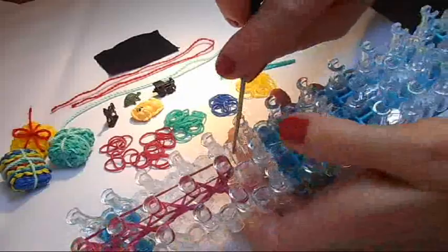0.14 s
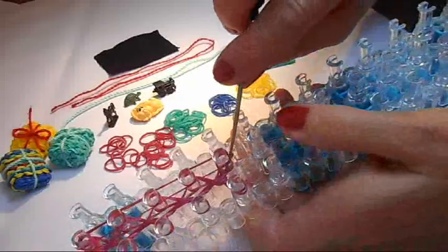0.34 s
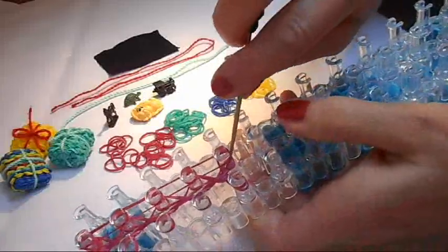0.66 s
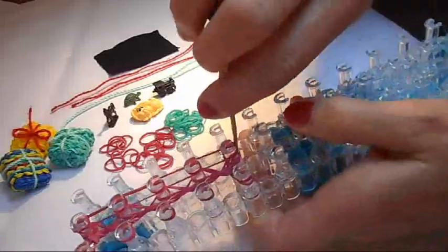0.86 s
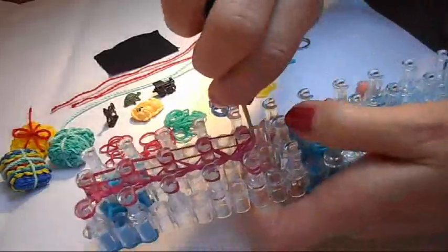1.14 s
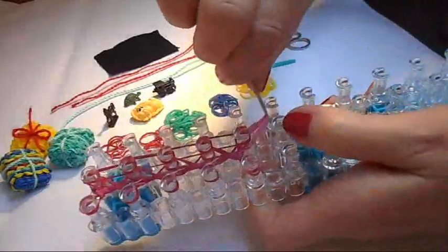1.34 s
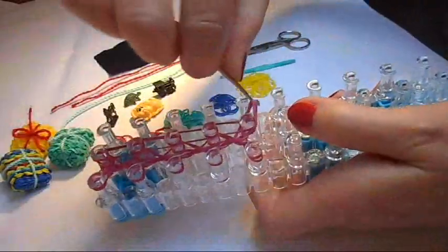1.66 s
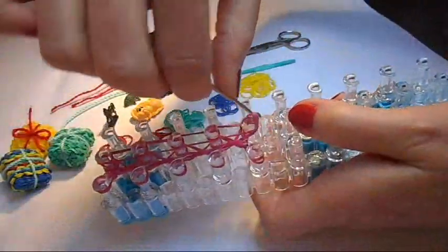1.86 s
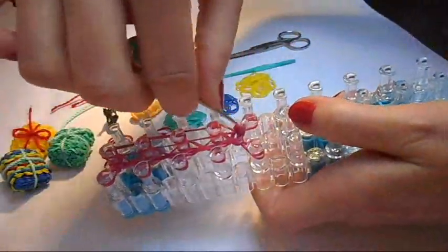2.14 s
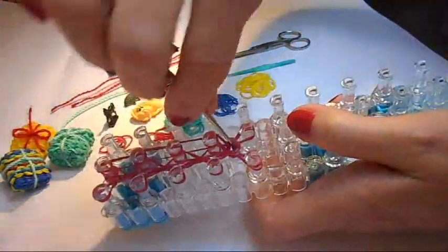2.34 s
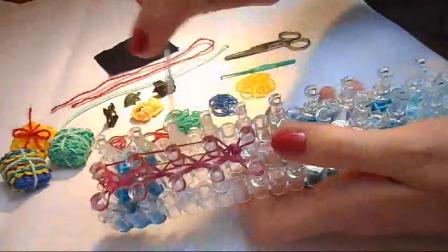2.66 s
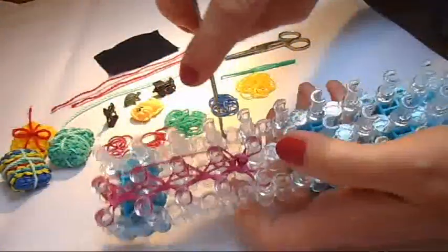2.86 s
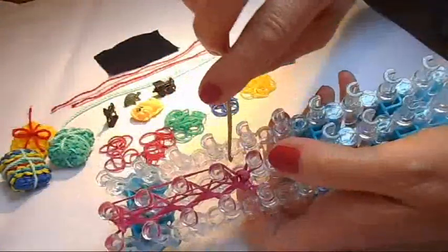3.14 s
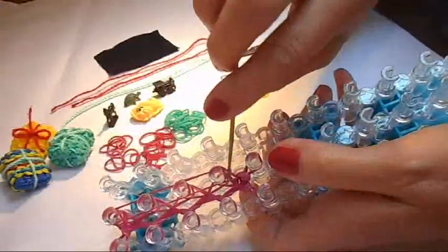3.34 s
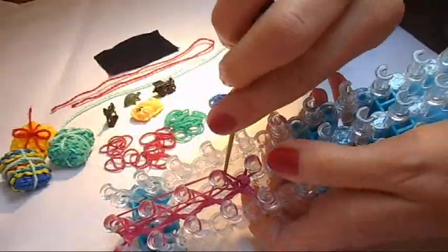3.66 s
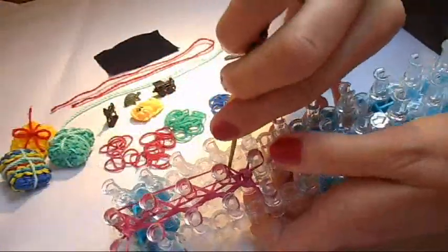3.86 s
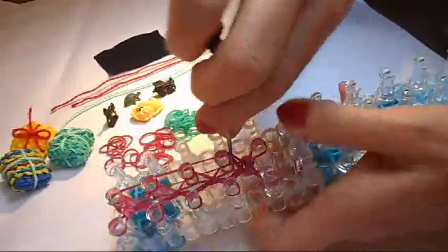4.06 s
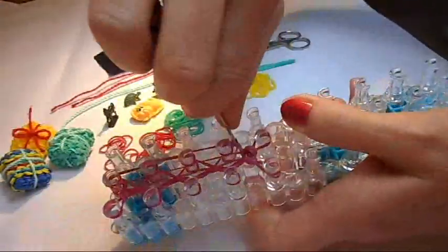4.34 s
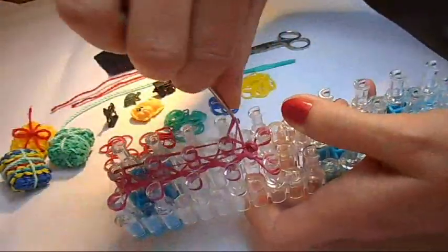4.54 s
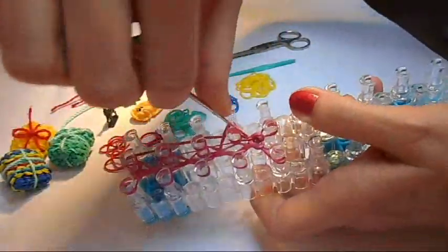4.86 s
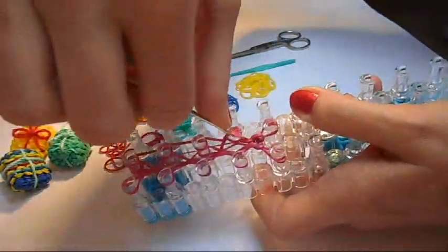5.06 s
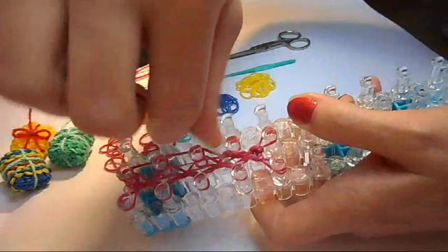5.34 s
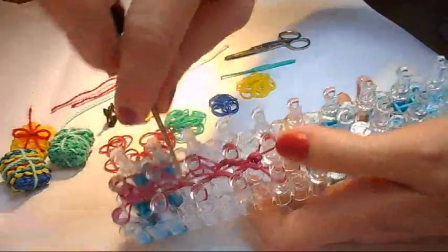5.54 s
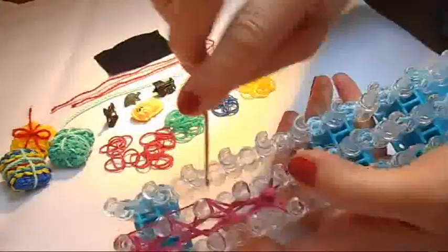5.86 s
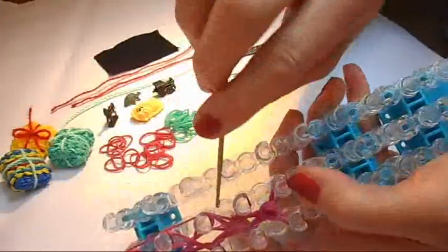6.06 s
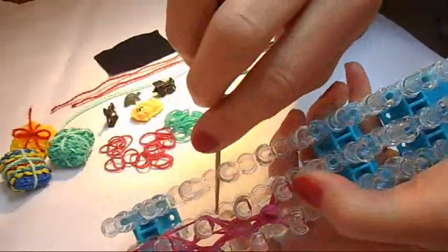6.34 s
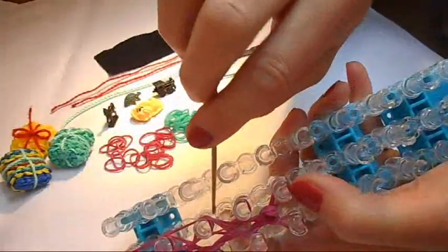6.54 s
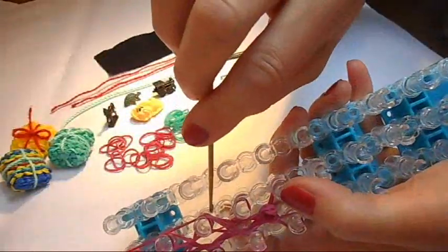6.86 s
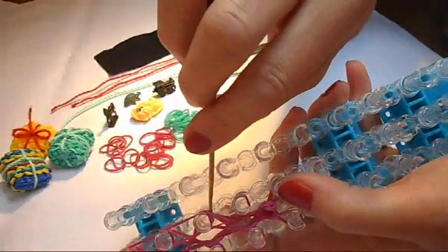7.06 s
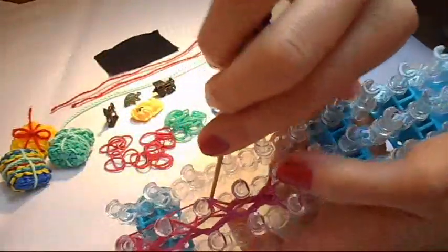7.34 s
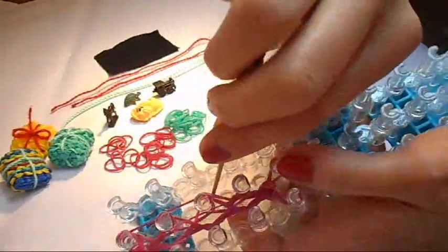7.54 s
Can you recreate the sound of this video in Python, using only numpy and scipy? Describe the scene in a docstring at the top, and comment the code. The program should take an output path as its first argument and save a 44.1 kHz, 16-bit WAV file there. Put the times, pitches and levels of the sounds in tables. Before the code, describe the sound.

Indoors, over the steady hiss of a fan, a metal hook taps and scratches at plastic loom pegs close to the microphone. The small, chattering clicks come unevenly, some sharp and some faint, as rubber bands are lifted over. Two busy runs each end with a soft scrape of the loom on the table. Then the loom is held off the table and the taps turn thinner, ending with a few quiet ticks.

```python
"""Indoors, a small camera's microphone close to a hand-held plastic loom; a fan hisses in the room throughout.
From 0.3 s a metal hook works rubber bands over the hollow pegs: each tap chatters and rings the loom.
Near 3 s the loom slides on the table between rows; the taps pick up at 4 s, and it slides again at 5.8 s.
Held off the table, it gives thinner taps from 6.2 s, and a few faint ones close the scene after 7.2 s.
All along the camera samples at half rate and repeats each sample, which mirrors the treble upwards."""
import sys
import numpy as np
from scipy import signal
from scipy.fft import rfft, irfft, next_fast_len
from scipy.io import wavfile

SR = 44100
rng = np.random.default_rng(int(sys.argv[2]) if len(sys.argv) > 2 else 0)


def wav_record(signal):
    """Record a signal, one row per channel, as 16-bit PCM in the file named by sys.argv[1]."""
    frames = np.transpose(np.atleast_2d(signal))
    bounded = np.clip(frames, -1, 1)
    # unit amplitude maps onto the largest positive 16-bit level
    quanta = np.round(bounded * 32767).astype(np.int16)
    wavfile.write(sys.argv[1], SR, quanta)


N = 339129

# hook on pegs: start_s, level_db (first 10 ms), hardness_db_per_octave, base_over_bar_db, favoured_hz,
# rise_ms, fade_ms (both before each part's contact share)
TAPS = [(0.2894, -34.5, -1.5, -5, 3500, 0.75, 2.3), (0.5636, -47, -5.2, -1, 3400, 0.67, 4.7),
        (0.761, -51, 1, -7, 3610, 1.18, 4.5), (0.766, -40.5, -6, -16, 1720, 1.28, 6.1),
        (0.9654, -28.5, -2.5, -15, 2540, 0.61, 5.9), (1.1079, -32, -5.5, -6, 1950, 1.18, 4.6),
        (1.1804, -33, 3.0, -13, 3080, 1.6, 4.0), (1.262, -44, -5, -5, 2580, 0.85, 3.8),
        (1.281, -40.5, -1.0, -5, 3300, 0.91, 2.9), (1.3096, -49.5, -2, -16, 2000, 1.2, 3.1),
        (1.325, -58, 0.7, -2, 2810, 0.25, 2.2), (1.3829, -41.0, -0.5, -7, 2440, 0.98, 3.5),
        (1.4066, -51, -7.3, -7, 2070, 1.05, 4.5), (1.4151, -47.5, -4.3, -10, 1830, 0.84, 3.6),
        (1.4256, -46, -8.3, -9, 1800, 0.33, 1.6), (1.4413, -33, 2, -4.5, 1290, 1, 2.6),
        (1.459, -34, 1, -18, 3080, 0.67, 2.9), (1.4803, -37.0, 2, -10, 3420, 1.17, 3.5),
        (1.5047, -33, 5, -13, 2070, 0.88, 2.7), (1.533, -38.5, 1, 1, 2650, 1.33, 3),
        (1.5456, -38, 3, -21, 2290, 1.48, 2.5), (1.556, -31, 3, -6, 2710, 1.44, 3.1),
        (1.5626, -29, 8.5, -10, 6550, 0.41, 3.2), (1.605, -34.5, 0.8, -3, 2780, 1.37, 2.8),
        (1.622, -45, 0, -9, 2060, 0.33, 4.2), (1.645, -33, -6.5, -6, 2770, 1.3, 3.7),
        (1.6588, -23.5, 0.3, -6.5, 2700, 0.28, 2.8), (1.7105, -54, -2, -13, 1580, 0.25, 2.3),
        (1.7551, -26.5, 4.5, -10.5, 4540, 2, 2.1), (1.9, -31.5, 4, -11, 3050, 0.42, 3.7),
        (2.028, -57, 9, -2, 3400, 0.25, 3), (2.0457, -33.5, 2.5, -5.5, 1570, 0.84, 4),
        (2.0929, -18, 1.6, -17, 1900, 0.5, 3.6), (2.2, -36, -1, -12, 3400, 1.22, 3.1),
        (2.2163, -30, -0.2, -16, 2780, 1.4, 2.9), (2.3397, -35.5, -1.5, -10.5, 1980, 1.3, 4.2),
        (2.544, -40, -3.5, -9, 1950, 1.2, 11), (2.5646, -28, 0.2, -6, 3100, 1, 6.7),
        (2.675, -45.5, -5, -16, 1720, 0.87, 4.5), (2.685, -39.0, 0, -2, 2720, 0.76, 2.6),
        (2.7977, -38.5, -0.3, -14, 1870, 1.5, 3.3), (3.3528, -39, 0.8, -9, 1910, 0.7, 2.5),
        (3.592, -51.0, -1.7, -1, 1360, 0.25, 1.8), (3.6081, -43.0, 1.5, -9, 3400, 0.3, 2.6),
        (3.7241, -42.5, -2.3, -2.5, 1760, 1.2, 2.5), (4.071, -29, -5, -14, 1980, 1.6, 2),
        (4.119, -46, 0.5, -8, 1930, 0.78, 11), (4.1496, -32, 2.3, -13, 3140, 1.1, 2.5),
        (4.203, -41.5, -3.5, -11, 2020, 1, 3.6), (4.2488, -36.5, -2.5, -4, 2080, 0.84, 2.3),
        (4.2678, -20.5, 3.5, -1.5, 3200, 1.16, 2.9), (4.3521, -24.5, -0.0, -6.5, 4240, 1.37, 3.3),
        (4.3884, -34.0, -5, -14, 3420, 1.23, 2.7), (4.48, -23, 2.7, -5.5, 2070, 1.45, 3.7),
        (4.615, -44.0, 0.5, -9, 3070, 0.72, 4.1), (4.7183, -21, 1, -11, 2660, 0.76, 3.9),
        (4.9554, -32.5, -0.9, -21, 1950, 1.6, 3), (5.111, -39.5, -3, -6, 4620, 1.8, 6.2),
        (5.114, -23.5, 4.1, -29, 4700, 1.3, 2.7), (5.208, -34.5, -0.4, -6.5, 4190, 0.78, 3),
        (5.371, -43.5, -0.5, -10, 2000, 1.55, 3), (5.4, -48, -7.6, -13, 1960, 1.13, 2.6),
        (5.4143, -26, 1.1, -12, 2100, 0.82, 2.6), (5.433, -46, 7, -2, 2770, 1.38, 2.9),
        (5.4743, -40, 0.8, -19, 3190, 0.76, 3.5), (5.484, -28.5, -2, -11.5, 1920, 0.89, 3.7),
        (5.513, -46, -8, -12, 2000, 1.18, 5.1), (5.5185, -35.5, -6.5, -1, 2100, 1.7, 6.5),
        (5.5702, -22.5, 5.0, -3.5, 5500, 0.68, 4.4), (5.6815, -46, 2, -17, 3450, 0.59, 2.2),
        (5.696, -55.0, 2, -7, 2100, 0.6, 2), (5.7524, -45, 2.3, -6, 3100, 0.53, 9.4),
        (5.7776, -47.5, 3, 0, 1860, 0.8, 8.4), (5.796, -47, -3.2, -14, 1900, 0.68, 1.9),
        (6.2064, -26, -5.5, -17, 1880, 0.8, 5), (6.2575, -39.5, -5.5, -16, 1900, 0.86, 3.6),
        (6.395, -31.5, 3, -2, 1310, 1.5, 3.1), (6.4296, -49, -0.2, 4, 1300, 0.54, 3.3),
        (6.484, -31, 2.5, -6.5, 4010, 1.8, 3.9), (6.5352, -42.0, 2.5, -4, 2780, 0.74, 2.8),
        (6.602, -28.5, -0.5, -3.5, 1840, 1.4, 2.8), (7.291, -48, 2, -2, 1820, 0.96, 2.7),
        (7.424, -46.5, 1.1, -10, 1880, 0.83, 3), (7.4375, -52, -3, -6, 1900, 0.6, 2),
        (7.4477, -53, -3, 3, 3100, 0.6, 1.8), (7.511, -56, -8, -8, 1900, 0.5, 1.4)]
# modes, one list each for bar, table, base, pegs, peg lips, hook tip: pitch_hz, level_db, t60_s
PART_MODES = [
    [(1520, -10, 0.02), (1696, -3.5, 0.023), (1873, 1.5, 0.023), (2093, 2, 0.017), (2348, -4, 0.017)],
    [(483, 3, 0.022), (654, -1, 0.044)],
    [(900, -17, .035), (1080, -11, .022), (1310, 0, .032)],
    [(2553, -7, 0.018), (2787, 1, 0.0072), (2956, -3.5, 0.018), (3053, -1.5, 0.01), (3412, -1.5, 0.014),
     (3865, 0.5, 0.0075), (4240, -4, 0.014)],
    [(4570, -2, 0.0078), (5160, -1.5, 0.0095), (5780, 0, 0.011), (6110, 0.5, 0.0059), (6370, -0.5, 0.01),
     (6680, 0.5, 0.0062), (7180, -3.5, 0.006)],
    [(7760, 0, 0.008), (8170, -3, 0.009), (8700, -4.5, 0.005), (9800, -8, 0.0084), (10230, -10.5, 0.0033)],
]
# contact length for the same six parts: share of the tap's rise and fade
CONTACT_SHARE = [0.68, 0.8, 0.71, 0.89, 1.19, 1.04]
# bar, pegs, peg lips, hook tip in a tap of hardness 0: level_db
TAP_PART_DB = [-4.5, -4, -7, -16]
# pitch of those four parts, counted from about the pegs: height_octaves
TAP_PART_OCTAVES = [-0.61, -0.044, 0.82, 1.54]
# low end of a tap, lifted as the loom rests on the table, thinned when held off: time_s, gain_db
RESTING = [(0, 1), (2, 3), (4, 4.5), (4.8, 4), (5.1, 10), (5.7, 10), (6.1, -16), (6.7, -12), (7.2, -3)]
# strokes of loom on table, hook and bands on pegs:
# start_s, swell_s, hold_s, die_s, pegs_db, frame_db, whistle_hz, whistle_db
RUBS = [(0.096, 0.013, .055, .02, -50.5, -62, 3410, -57), (1.108, .004, .012, 0.06, -50, -58, 3600, -53),
        (1.185, .004, .012, 0.14, -53.5, -57, 3420, -61), (1.508, .04, 0.016, .005, -47, -47.5, 5200, -61),
        (2.112, .004, 0.062, .02, -54, -59, 4270, -68), (2.234, .004, .03, .04, -61, -67, 3800, -71),
        (2.714, 0.052, 0.032, .005, -53.5, -54, 5150, -64),
        (2.804, .004, 0.025, .05, -51.5, -57, 4240, -55),
        (2.877, 0.038, .02, 0.037, -55.5, -60.5, 4170, -54.5),
        (2.986, 0.039, 0.017, .045, -50.5, -52.5, 3100, -59),
        (4.141, .004, 0.061, 0.012, -51.5, -60, 3740, -54), (4.41, 0.06, .02, .005, -58, -55, 3400, -56),
        (5.125, .003, .01, 0.067, -63, -65, 3850, -66), (5.794, .004, .015, 0.043, -54.5, -56, 4140, -59),
        (5.827, 0.074, .045, .07, -54, -64, 4220, -53.5), (7.425, .004, 0.012, 0.039, -57, -60, 3700, -65)]
# rubbing balance within the frame (first three parts) and within pegs and tip (last three): level_db
RUB_PART_DB = [-9.5, -28, -17.5, 1, 0.5, -11]
# loom landing on the table top: start_s, level_db, favoured_hz
KNOCKS = [(2.5659, -49.5, 480), (5.5185, -54.5, 660), (2.0933, -62, 480), (4.7189, -66, 640),
          (6.5, -60, 480)]
# low bumps as the loom is shifted on the table: peak_s, level_db
BUMPS = [(2.822, -75), (5.605, -79), (5.788, -73)]
# the room's echo by band: band_hz, t60_s, level_db
ROOM_BANDS = [(497, 0.91, -23), (1990, 0.12, -14), (5140, 0.16, -13), (10000, 0.27, -21.5)]
# spectrum of the room and microphone hiss: frequency_hz, relative_db
HISS_SPECTRUM = [(15, -57), (25, -24.5), (103, -21.5), (140, -21), (199, -18.5), (238, -18.5), (291, -15),
                 (426, -16), (483, -13.5), (782, -12), (957, -6), (1400, -12), (2380, -11.5), (6550, -18),
                 (10600, -29), (13800, -65), (22000, -120)]
# hums of the fan: pitch_hz, width_hz, level_db
FAN_HUMS = [(101.6, 9.5, -86), (274, 53, -79), (976, 51, -65.5), (2020, 370, -68.5), (2730, 180, -71)]
# slow drift of hiss and hum: time_s, gain_db
BACKGROUND_DRIFT = [(0, 0.5), (1.5, 0), (3.5, -0.4), (5.5, 0.26), (6.5, -0.6), (7.7, -0.7)]
# the camera's filter ahead of its converter: frequency_hz, gain_db
INPUT_FILTER = [(9000, 0), (10300, -5), (10750, -14), (11025, -26)]
# step down in the top treble after the converter: frequency_hz, gain_db
TREBLE_STEP = [(15600, 0), (15900, -15), (16400, -16)]


def hook():
    """The metal hook tapping its way over the pegs, close to the microphone."""
    out, chance = np.zeros(N + 4096), rng.standard_normal((len(TAPS), 1120))
    for (start_s, *row), draws in zip(TAPS, chance):
        sound = tap(start_s, row, draws)
        out[round((start_s - .0004) * SR):][:len(sound)] += sound
    return out[:N]


def tap(start_s, row, draws):
    """One contact rings every part; a hard tap favours the high parts, the struck spot some modes."""
    level_db, hardness, base_db, favoured_hz, rise_ms, fade_ms = row
    bar, pegs, lips, tip = np.add(TAP_PART_DB, hardness * np.array(TAP_PART_OCTAVES))
    part_db = bar, bar - 36, bar + base_db, pegs, lips, tip  # the table rings far below the bar
    resting_db, low_end_hz = np.interp(start_s, *np.transpose(RESTING)), 1230
    out = 0
    for k, (modes, db, share) in enumerate(zip(PART_MODES, part_db, CONTACT_SHARE)):
        # the first 1024 draws make the force; the rest scatter each mode's level and pitch
        spot, pitch = draws[1024 + 16 * k:][:16].reshape(2, 8, 1)[:, :len(modes)]
        nearness = favour(modes, favoured_hz)
        is_low = np.array(modes)[:, :1] < low_end_hz
        lift_db = 2.2 * spot + 5 * nearness + max(resting_db, 0) * is_low
        force = chatter(share * rise_ms, share * fade_ms, draws)
        part = signal.fftconvolve(ring(modes, lift_db, detune=1 + .012 * pitch), force)
        out = out + amp(db + 2.5 * nearness.max()) * part / np.std(part[:441])
    out = colour(out, [(1000, min(resting_db, 0)), (low_end_hz, 0)])
    return amp(level_db) * out / np.std(out[:441])


def chatter(rise_ms, fade_ms, draws):
    """A contact force that chatters, swelling and dying."""
    ms = np.arange(1024) / SR * 1000
    swell = (1 - np.exp(-ms / max(rise_ms, .02))) ** 2
    return swell * np.exp(-ms / max(fade_ms, .2)) * draws[:1024]


def favour(modes, favoured_hz):
    """How well the struck spot drives each mode: 1 at the favoured pitch, falling off around it."""
    return np.exp(-(np.log(np.array(modes)[:, :1] / favoured_hz) / .05) ** 2)


def ring(modes, lift_db=0, detune=1):
    """Impulse response of one part: dying sines, neighbours starting in opposite directions."""
    hz, db, t60 = np.transpose(modes)[:, :, None]
    t, sign = np.arange(2048) / SR, (-1) ** np.arange(len(modes))[:, None]
    decay_db = 60 * t / np.minimum(t60, 50 / hz)  # plastic loses 60 dB within 50 cycles
    sines = sign * amp(db + lift_db - decay_db) * np.sin(2 * np.pi * hz * detune * t)
    return radiate(sines.sum(0), modes)


def radiate(x, modes):
    """A part pushes air only near its own modes: a steep band-pass around them."""
    edges_hz = .9 * modes[0][0], 1.1 * modes[-1][0]
    return signal.sosfilt(signal.butter(4, edges_hz, "bandpass", fs=SR, output="sos"), x)


def rubbing():
    """Dense tiny slips of uneven size drive the loom's modes, and one hollow peg whistles along."""
    slips_per_s, whistle_width_hz, edge_db, fade_s = 6000, 220, -10.5, 0.026
    slips = amp(0.98 * rng.exponential(1, N)) * rng.standard_normal(N)
    slips *= rng.random(N) < slips_per_s / SR
    bodies = [amp(db) * unit_rms(ring(modes)) for modes, db in zip(PART_MODES, RUB_PART_DB)]
    frame = unit_rms(signal.oaconvolve(slips, sum(bodies[:3]))[:N])
    pegs = unit_rms(signal.oaconvolve(slips, sum(bodies[3:]))[:N])
    t, out = np.arange(N) / SR, np.zeros(N)
    for start_s, swell_s, hold_s, die_s, pegs_db, frame_db, whistle_hz, whistle_db in RUBS:
        peg_air = signal.iirpeak(whistle_hz, whistle_hz / whistle_width_hz, SR)
        whistle = unit_rms(signal.lfilter(*peg_air, signal.lfilter(*peg_air, slips)))
        corners_s = np.cumsum([start_s, swell_s, hold_s, die_s])
        fade = np.clip(np.minimum(t - start_s, corners_s[-1] - t) / fade_s + 1, 0, 1)
        stroke = fade * amp(np.interp(t, corners_s, [edge_db, 0, 0, edge_db]))
        out += stroke * (amp(pegs_db) * pegs + amp(frame_db) * frame + amp(whistle_db) * whistle)
    return out


def knocks():
    """The table top rings alone when the loom lands on it."""
    out, chance = np.zeros(N + 4096), rng.standard_normal((len(KNOCKS), 1024))
    table_modes = PART_MODES[1]
    for (start_s, level_db, favoured_hz), draws in zip(KNOCKS, chance):
        body = ring(table_modes, lift_db=10 * favour(table_modes, favoured_hz))
        sound = signal.fftconvolve(body, chatter(rise_ms=0.71, fade_ms=2.1, draws=draws))
        out[round(start_s * SR):][:len(sound)] += amp(level_db) * sound / np.std(sound[:441])
    return out[:N]


def bumps(pitch_hz=64, rise_db_per_s=220, fall_db_per_s=160):
    """The table top hums low while it is pushed."""
    t, level = np.arange(N) / SR, 0
    for peak_s, level_db in BUMPS:
        level += amp(level_db - np.maximum(rise_db_per_s * (peak_s - t), fall_db_per_s * (t - peak_s)))
    return level * np.sqrt(2) * np.sin(2 * np.pi * pitch_hz * t)


def room(x):
    """The room behind the close sound: sparse echoes of random sign, each band dying at its own speed."""
    echoes = np.zeros(SR // 2)
    slots = np.arange(260, len(echoes) - 20, 20)
    echoes[slots + rng.integers(0, 20, len(slots))] = rng.choice([-1., 1.], len(slots))
    hz, t, spectrum = signal.stft(echoes, SR, nperseg=256)
    t60 = curve_at([band[:2] for band in ROOM_BANDS], hz)[:, None]
    tail = signal.istft(spectrum * amp(-60 * t / t60), SR, nperseg=256)[1]
    reverb = signal.oaconvolve(x, tail / np.linalg.norm(tail))[:N]
    return colour(reverb, [band[::2] for band in ROOM_BANDS])


def fan_and_hiss(hiss_db=-55.5):
    """Room tone: room and microphone hiss plus the fan's fuzzy hums, each one noise in a resonance."""
    hz = np.fft.rfftfreq(N, 1 / SR)
    out = amp(hiss_db) * unit_rms(colour(rng.standard_normal(N), HISS_SPECTRUM))
    for pitch_hz, width_hz, level_db in FAN_HUMS:
        resonance = 1 / (1 + (2 * (hz - pitch_hz) / width_hz) ** 2)
        out += amp(level_db) * unit_rms(irfft(resonance * rfft(rng.standard_normal(N)), N))
    return out * amp(np.interp(np.arange(N) / SR, *np.transpose(BACKGROUND_DRIFT)))


def amp(db):
    """Decibels to gain."""
    return 10 ** (np.asarray(db) / 20)


def unit_rms(x):
    """Scales to rms 1."""
    return x / np.sqrt(np.mean(x ** 2) + 1e-20)


def curve_at(points, hz):
    """Reads a (frequency_hz, value) curve on a log-frequency axis."""
    points_hz, values = np.transpose(points)
    return np.interp(np.log(hz + 1), np.log(points_hz + 1), values)


def colour(x, points):
    """Equalises by a (frequency_hz, gain_db) curve."""
    size = next_fast_len(len(x))
    gain = amp(curve_at(points, np.fft.rfftfreq(size, 1 / SR)))
    return irfft(rfft(x, size) * gain, size)[:len(x)]


def scene():
    """At the microphone, in mono: loom and table up close, echoes and room tone behind."""
    loom = hook() + knocks() + rubbing()
    return (loom + room(loom) + bumps() + fan_and_hiss())[None]


def record(dry):
    """The camera: half-rate sampling with every sample held twice, a treble step, then the band limit."""
    filtered = colour(dry[0], INPUT_FILTER + [(11400, -90)])
    held = np.repeat(filtered[::2], 2)[:N]
    band_limit = signal.firwin(511, cutoff=16600, window=("kaiser", 9), fs=SR)
    return signal.oaconvolve(colour(held, TREBLE_STEP), band_limit, "same")[None]


dry = scene()
out = record(dry)
wav_record(out)
```